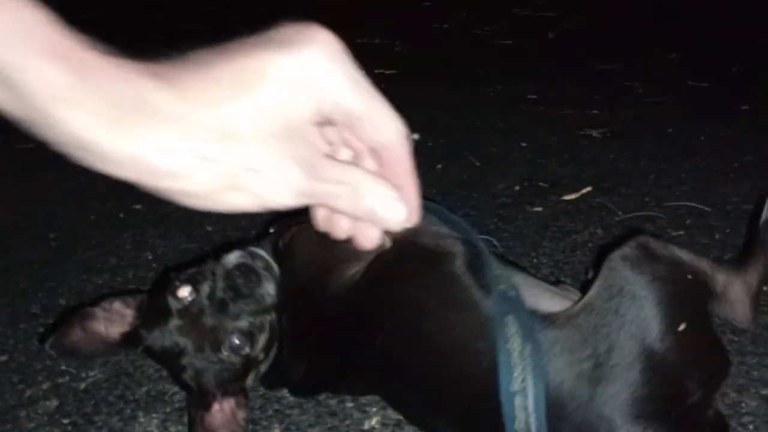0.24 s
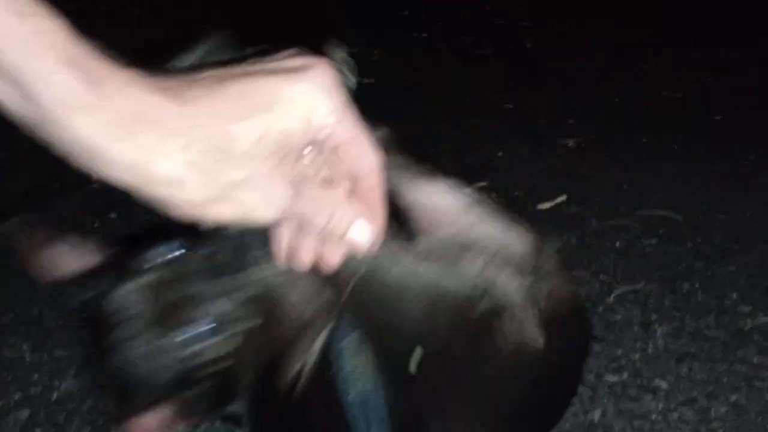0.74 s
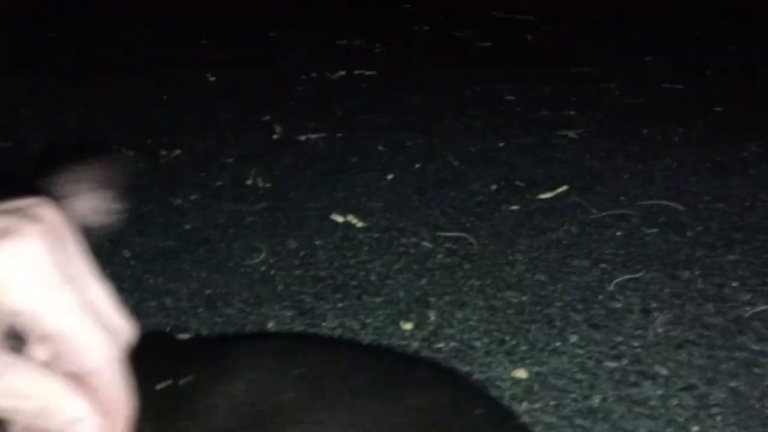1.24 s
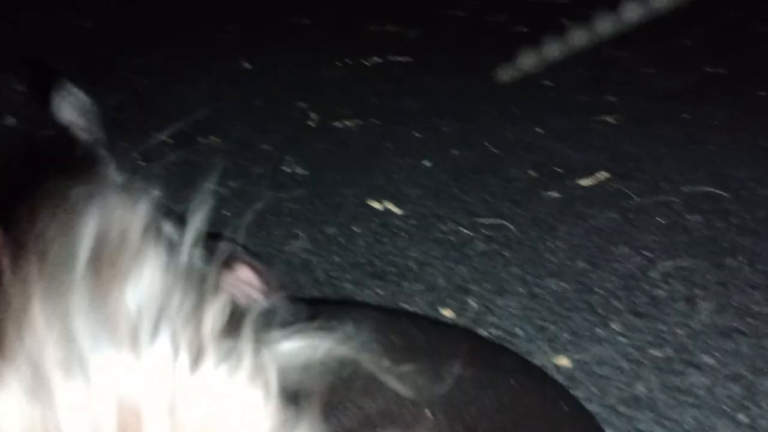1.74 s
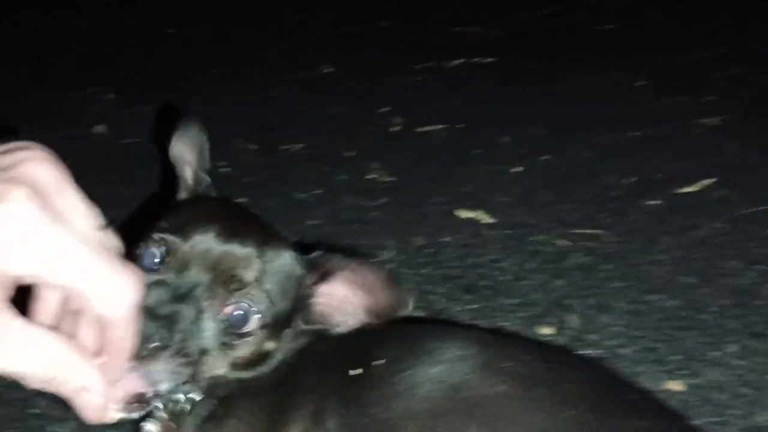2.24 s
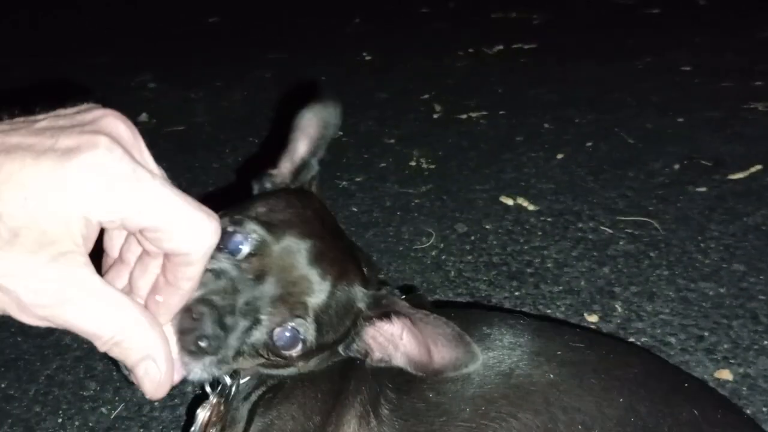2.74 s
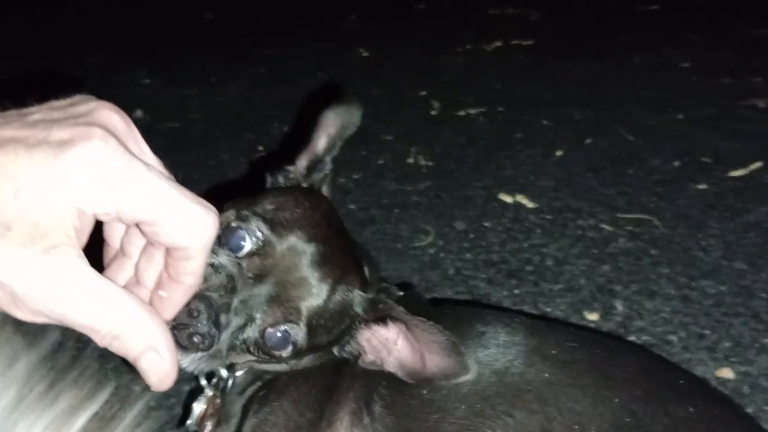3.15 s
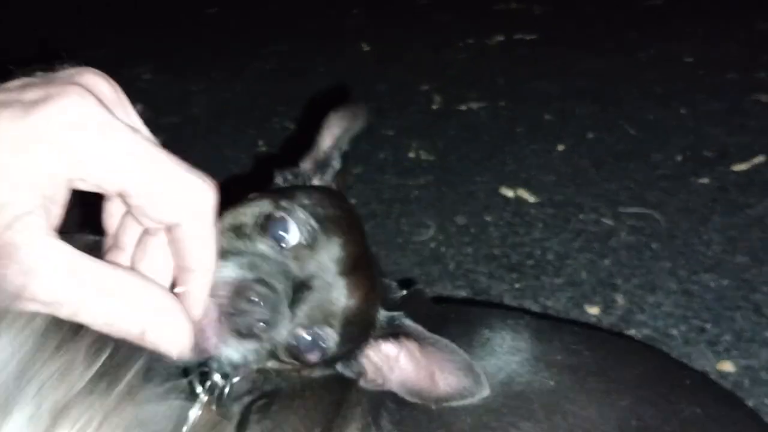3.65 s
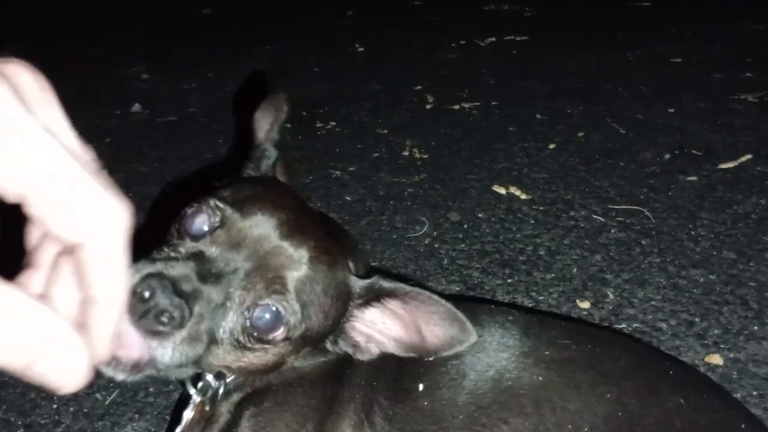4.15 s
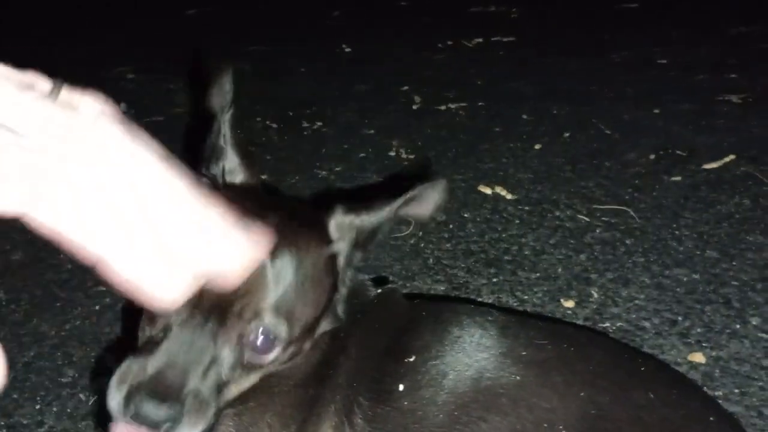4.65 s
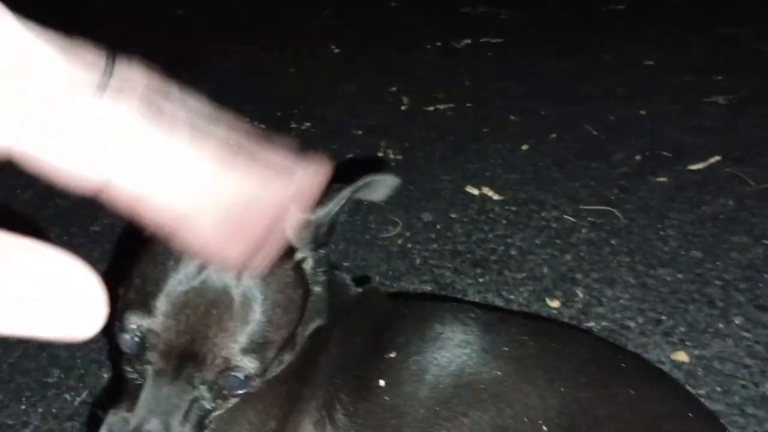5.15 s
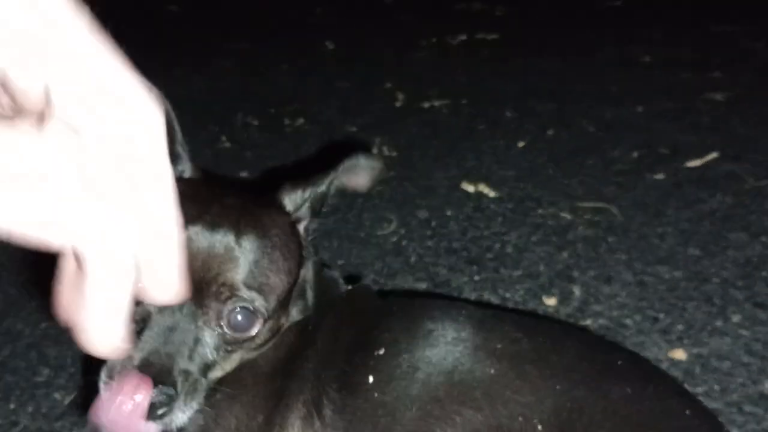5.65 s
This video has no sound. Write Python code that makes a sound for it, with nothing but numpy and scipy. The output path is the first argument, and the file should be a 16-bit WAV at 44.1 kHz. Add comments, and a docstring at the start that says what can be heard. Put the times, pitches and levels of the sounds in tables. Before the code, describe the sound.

Two dogs petted on asphalt, very near the microphone, mostly left of centre. Rubbing swishes swell and fade; tags rattle brightly just after one second, then tinkle in isolated clinks. Low bumps of fingers on the camera cluster mid-way. Far off, muffled firework-like bangs sound, the strongest past three seconds, rolling away over a low, soft night murmur.

```python
"""On asphalt at night, two dogs are petted close to a hand-held camera.
Collar tags jingle (ringing discs), a hand and a harness rub fur (swelling noise), and claws and grit
tick (short bursts of tones). Fingers and a collar bump the camera (low damped notes and noise).
Far away a few bangs, probably fireworks, go off as filtered pulses; the loudest rolls around
the neighbourhood as fading, lumpy noise. Soft night air lies under it all."""
import sys
import numpy as np
from scipy import signal
from scipy.fft import rfft, irfft
from scipy.io import wavfile
from scipy.ndimage import uniform_filter1d

SR = 44100
rng = np.random.default_rng(int(sys.argv[2]) if len(sys.argv) > 2 else 0)


def unload_audio(sound):
    """Save the sound as a 16-bit wav file, at the path given as the first command line argument."""
    columns = np.transpose(np.atleast_2d(sound))
    # keep every value between -1 and 1, then stretch to whole-number steps
    steps = np.round(np.clip(columns, -1, 1) * 32767)
    wavfile.write(sys.argv[1], SR, steps.astype(np.int16))


N = 260631
TIME = np.arange(N) / SR  # seconds

# All levels are in dB before the final mix and limiter. Colours are relative: noise is brought
# to one strength after colouring. A positive left-right dB means louder on the left.

# Night air. Each row: pitch in Hz, relative level in dB.
AIR_COLOUR = [(25, -18), (50, -8), (80, 5.5), (130, 6.5), (250, 0.5), (400, -9.5), (700, -15.5),
              (1200, -21), (2200, -31.5), (5000, -33.5), (9000, -43), (16000, -57.5)]
# How alike left and right noise are. Each row: pitch in Hz, correlation (1 is identical).
LIKENESS = [(30, 0.019), (100, 0.82), (250, 0.89), (500, 0.42), (1000, 0.21), (2500, 0), (16000, 0)]
# The long roll: near houses answer loudly and briefly, far ones softly and for long.
# Each row: starting level in dB before the roll's own gain, fading in dB per second.
ROLL_FADES = [(-35.5, 84), (-49, 6)]
# Colour of the roll. Each row: pitch in Hz, relative level in dB.
ROLL_COLOUR = [(30, -32), (60, -6), (100, -2), (170, -0.5), (300, -4.5), (400, -9.5), (520, -24.5),
               (800, -24.5), (1300, -30.5), (2200, -47), (4000, -97)]
# Distant bangs and their distinct echoes. Each row: start in seconds, peak of the blast in dB,
# pulse length in milliseconds, then crack and scatter in dB, each before its shared gain.
BANGS = [(0.4427, -37, 1.07, -9, 0.5), (0.4692, -31, 0.73, -6, -8.5), (1.067, -43.5, 0.68, -9, -40),
         (1.101, -38.5, 0.72, -7, -27), (1.1088, -41.5, 0.77, -14, -26.5), (1.692, -51.5, 0.87, 4, 15),
         (1.717, -35, 0.49, 0, -4), (3.359, -14.5, 1.83, -13.5, -18.5), (3.3678, -20.5, 1.64, -15.5, -17.5),
         (3.3772, -28, 1.9, -22.5, -24.5), (3.3896, -12.5, 1.96, -13.5, -19),
         (3.3957, -21, 1.44, -28, -15.5), (3.403, -24, 1.8, -14, -22), (3.461, -39, 0.78, -0.5, -14),
         (3.496, -35, 0.54, -15, -18), (3.521, -30.5, 1.74, -22, -20), (4.632, -43, 1.1, -21, -15.5)]
# Colours of the crack and of the scattered sound. Each row: pitch in Hz, relative level in dB.
CRACK_COLOUR = [(60, -50), (200, 0.5), (450, -7.5), (700, 1), (1000, -10.5), (1500, -17), (2400, -24),
                (3100, -45), (4500, -58.5)]
SCATTER_COLOUR = [(40, -40), (100, -10.5), (200, 1.5), (350, 1.5), (480, -4.5), (750, -5.5), (1100, -19),
                  (1600, -23), (2400, -34.5), (3500, -65.5)]
# Fingers shifting on the camera body.
# Each row: start in seconds, level in dB before the shared bump gain, left-right dB.
BUMPS = [(0.763, -43.5, 38), (0.811, -41.5, 19), (2.188, -42, 1), (2.213, -36, 0), (2.298, -30.5, 26),
         (2.377, -33, 31.5), (2.394, -34, 30.5), (2.412, -32.5, 22.5), (2.461, -37.5, 19),
         (2.504, -33.5, 29), (2.569, -41.5, 12), (2.724, -35.5, 33.5), (2.765, -36.5, 23),
         (2.819, -41.5, 23), (2.867, -30, 33), (2.909, -39.5, 24), (2.955, -35, 32), (3, -31, 35),
         (3.032, -42, 29.5), (3.112, -38.5, 29), (4.139, -36.5, 37), (4.68, -43.5, 32.5), (4.79, -39, 19.5),
         (4.978, -42.5, 26)]
# Harness webbing sliding over the coat. Each row: fastest moment in seconds,
# speeding up in seconds, slowing down in seconds, level in dB.
SLIDES = [(1.58, 0.069, 0.047, -69), (2.277, 0.018, 0.022, -65), (2.735, 0.03, 0.02, -70.5),
          (3.06, 0.048, 0.057, -64.5), (5.2, 0.09, 0.14, -77.5)]
# Hiss of the webbing. Each row: pitch in Hz, relative level in dB.
WEBBING_COLOUR = [(1500, -24), (3300, -14), (4500, -3.5), (6000, -1), (7500, -5), (10000, -16),
                  (16000, -29.5)]
# Hand and harness on fur. Each row: fastest moment in seconds, speeding up in seconds,
# slowing down in seconds, low swish in dB, high fizz in dB, left-right dB.
STROKES = [(.13, 0.12, .16, -58, -65.5, 6.5), (.405, 0.068, 0.1, -54.5, -60, 11),
           (0.571, 0.05, 0.078, -63.5, -71, 7), (1.02, 0.13, .14, -60.5, -69, 2),
           (1.53, 0.16, 0.14, -62, -76.5, 7), (1.762, 0.058, 0.089, -78, -92, 17.5),
           (2.83, 0.043, 0.028, -69, -68, -3), (3.07, 0.033, 0.067, -67, -78, 3),
           (3.601, .07, 0.36, -74.5, -82.5, 4), (4.021, 0.066, 0.21, -71.5, -80, 7.5),
           (4.277, 0.028, 0.038, -59.5, -48.5, 10), (4.44, .07, 0.14, -61, -76, 3.5),
           (4.88, 0.1, 0.088, -68, -72, -2), (5.131, 0.14, 0.13, -67.5, -76.5, -1),
           (5.64, 0.042, .04, -69.5, -76, -1), (5.9, 0.083, .08, -67.5, -66.5, 4)]
# Colours of swish and fizz. Each row: pitch in Hz, relative level in dB.
SWISH_COLOUR = [(30, -3.5), (150, 18), (300, 16.5), (500, 9), (750, 3.5), (1100, -4), (1800, -0.5),
                (2800, 2), (4100, -0.5), (5200, 2.5), (6800, -2.5), (8400, 2), (11000, -25), (16000, -43.5)]
FIZZ_COLOUR = [(2000, -72), (6000, 5.5), (9000, 10.5), (12000, 4.5), (16000, 9)]
# Claws, grit and harness fittings. Each row: start in seconds, peak in dB, centre in Hz,
# spread to either side in octaves.
TICKS = [(.204, -55, 7600, .1), (0.638, -51, 4770, .34), (0.825, -54.5, 7200, 0.24),
         (0.881, -52.5, 6920, 0.25), (.9444, -42, 6100, 1.2), (0.9706, -43.5, 12700, 0.49),
         (1.002, -42, 12000, 1.5), (1.0188, -43.5, 4000, 0.28), (1.047, -52, 6500, 1),
         (1.066, -41.5, 7100, 1.1), (1.082, -49.5, 3680, 0.055), (1.1073, -44, 5440, 0.96),
         (1.129, -41, 13000, 1.8), (1.8556, -61.5, 9400, .4), (1.8808, -58.5, 4380, 0.17),
         (1.9323, -55.5, 4800, 0.11), (1.947, -51.5, 4540, .3), (1.992, -48.5, 2270, 0.3),
         (2.247, -52, 8200, .23), (2.305, -58.5, 9000, .5), (2.358, -56.5, 10500, .4),
         (2.4556, -56, 3980, 0.35), (2.613, -51.5, 7240, 0.39), (3.123, -49.5, 5960, 0.77),
         (3.456, -43.5, 5430, 2.4), (3.526, -40, 9100, 0.5), (3.577, -56.5, 5200, 0.099),
         (3.625, -44, 8350, 1.1), (3.75, -56, 7900, 0.44), (3.819, -51, 2600, 0.33),
         (3.8298, -42, 5000, 0.28), (3.967, -51, 6000, .46), (3.982, -50, 8000, .7),
         (4.567, -50.5, 2780, 0.19), (4.575, -49, 6960, 1.4), (4.928, -52, 7700, 0.49),
         (5.1564, -51.5, 7300, 0.17), (5.59, -61, 4500, .08)]
# Tags of the shaggy dog as it pushes past. Each row: start in seconds, peak in dB, treble tilt
# in dB per octave, then ring of the first and of the second tag in dB before the dog's ring level.
SHAGGY_HITS = [(1.183, -41, -8, -8.5, -2), (1.190, -24.5, -6, 9, 4), (1.198, -26.5, 14, 7, -9),
               (1.207, -26, -9.5, 7, -6), (1.2215, -19, -8.5, -11, 6), (1.227, -21.5, 1.5, 16, -8),
               (1.2375, -18, 0, -2.5, 9.5), (1.243, -23, -0.5, -8, 13.5), (1.2478, -6.5, 7, 7.5, 10),
               (1.252, -14, 11.5, 11, -12), (1.295, -33.5, -9, 4, -10), (1.305, -25, -5, -2, 1),
               (1.3115, -16, -1.5, 2.5, -13), (1.320, -31, -6, -4, 8), (1.333, -28, -7, -13, -13),
               (1.343, -40, -5, 0, -5), (1.353, -37, -11, -14, 1), (1.360, -25, -1, -22, 4),
               (1.366, -23.5, -5, -1, 1), (1.379, -22, 1, -15, -12), (1.4075, -39.5, -5, -7, 1),
               (1.460, -41, -5, -17, -2), (1.4685, -29.5, -6, -2.5, -7), (1.540, -45.5, -3.5, -8.5, -17)]
# Tags of the black dog as it turns its head. Each row: the same columns.
BLACK_HITS = [(2.404, -20.5, 1.5, 6, -26), (2.5945, -41, -0.5, -7, -13), (2.7105, -47.5, 3, -11, -7),
              (2.7788, -21, 5.5, -2.5, -14), (2.805, -28, 1, 3, -21), (2.818, -29, -1, -6, 0),
              (2.823, -26, 0, 7, -21), (2.8445, -36.5, 0, -3, -9), (2.871, -47, 4, -2, -6),
              (2.921, -46.5, 2, 4, -4), (2.9455, -31, 4, -4, -29), (2.958, -24.5, 13, 5.5, -25),
              (3.0748, -18, 0.5, -6, -31), (3.082, -29, -1.5, -5, -22), (3.9995, -26.5, 0, -18, -22),
              (4.180, -42, 3, -6, -2), (4.1975, -35, 12, -8, -7), (4.3815, -34, -10.5, 7, 10),
              (4.418, -38, -1, 7, -15), (4.431, -31, -6.5, 6, 3), (4.449, -46, 3, -3, 8),
              (4.4815, -41, -9, -11, 4), (4.515, -44, -10, -7, -1), (4.7575, -34.5, 2.5, -16, 3),
              (4.8003, -42, -7, -10, -4.5), (4.885, -36, 9, 12, -12), (4.9645, -47.5, -4, 3.5, -21),
              (5.0173, -35, 1, -8, -3.5), (5.0655, -41, 1, -8, -6), (5.11, -53.5, 0, -10, 2),
              (5.376, -40.5, 3, -2.5, -5), (5.463, -50, -4.5, -5.5, 2), (5.5195, -45, -10.5, -14, 4),
              (5.626, -47, 2, -21.5, -5), (5.668, -50.5, -9, -2.5, 7.5)]
# The tags graze just before each contact and fall back together after it.
# Each row: typical time from the contact in seconds, level in dB relative to the contact.
SOFT_TOUCHES = [(-.005, -21.5), (.011, -19.5), (0.029, -31.5)]
# The dry clack of metal on metal. Each row: pitch in Hz, relative level in dB.
CLACK_COLOUR = [(1000, -45), (2200, -21.5), (4000, -9), (6500, 1), (9000, 3), (12000, 2.5), (13600, -2),
                (15200, 4), (16000, 2)]
# Natural tones of each dog's two tags, one list per tag. Each row: typical pitch in Hz, typical
# relative level in dB, seconds to fade by 60 dB before each hit makes it longer or shorter.
SHAGGY_TAGS = [
    [(2775, -37.5, .38), (8600, -4.5, .12), (9890, 4.5, 0.088), (12610, -13.5, 0.067), (16100, -4.5, .035)],
    [(3130, -15, 0.023), (6480, -16.5, 0.043), (7250, -22, .07), (12104, -1, 0.028), (11470, 3.5, .04),
     (11740, -4.5, .045), (15350, -6.5, 0.048), (15580, 0, 0.031)],
]
BLACK_TAGS = [
    [(4320, -14.5, 0.04), (5400, -19, 0.069), (7906, 11, 0.026), (7910, -33, 0.27), (8280, -9.5, 0.046),
     (10920, 6, 0.031), (10800, -31, 0.2), (11860, -8, .04), (11480, -5, 0.041), (14590, 2, 0.035)],
    [(4530, -9.5, 0.067), (6730, -9, 0.032), (7360, 11.5, 0.055), (9900, -9.5, 0.084), (12060, -3, 0.073),
     (7460, 5, 0.024)],
]
# Where each collar hangs as the dog moves. Each row: time in seconds, left-right dB.
SHAGGY_SIDE = [(1.19, 16), (1.354, 7), (1.426, 5), (1.5, 8)]
BLACK_SIDE = [(2.4, 12.5), (3, 17), (4, 10.5), (4.45, 14), (4.8, 5.5), (5.65, 0.5)]

AIR_DB = -61
ROLL_START_S, ROLL_RISE_S = 3.42, 0.043
CASE_HZ = 119  # typical low note of the camera case
STROKE_SHAPE = 1.3  # 1 is a pointed swell, 2 a round one
TICK_SIDE_DB = 10.5  # left-right
CEILING_DB, RECOVERY_DB_PER_S = -12, 35.5  # limiter
EDGE_HZ = 15950  # highest pitch let through


def amp(db):
    """Turn dB into a plain multiplier."""
    return 10 ** (np.asarray(db) / 20)


def unit_rms(x):
    """Scale to an average strength (rms) of 1."""
    return x / np.sqrt(np.mean(x ** 2) + 1e-20)


def unit_peak(x):
    """Scale so the largest swing is 1."""
    return x / (abs(x).max() + 1e-12)


def read(points, hz):
    """Read a curve between its points, with pitch on a logarithmic scale."""
    f, value = np.transpose(points)
    return np.interp(np.log(hz + 1), np.log(f + 1), value)


def add(mix, s, sound):
    """Add a sound to the mix, starting at s seconds."""
    part = mix[:, max(round(s * SR), 0):][:, :sound.shape[1]]
    part += sound[:, :part.shape[1]]


def pan(side_db):
    """Left and right gains of constant power."""
    gains = amp(np.array([side_db, -side_db]) / 2).reshape(2, -1)
    return gains / np.sqrt(np.mean(gains ** 2, 0))


def onset(t, rise_s):
    """A quick smooth rise from 0 towards 1."""
    return 1 - np.exp(-t / rise_s)


def noise(colour, size):
    """Two channels of coloured noise, alike in the bass and unrelated in the treble."""
    hz = np.fft.rfftfreq(size, 1 / SR)
    left, other = rfft(rng.standard_normal((2, size)))
    same = np.clip(read(LIKENESS, hz), -1, 1)
    right = same * left + np.sqrt(1 - same ** 2) * other
    return unit_rms(irfft(np.array([left, right]) * amp(read(colour, hz)), size))


def grains(width):
    """Random ups and downs of strength 1, smoothed over this many samples."""
    return unit_rms(uniform_filter1d(rng.standard_normal(N), size=width))


def swell(s, rise_s, fall_s):
    """The speed of one stroke: up to 1 at time s and down again."""
    distance = np.maximum((s - TIME) / rise_s, (TIME - s) / fall_s).clip(0, 6)
    return np.exp(-distance ** STROKE_SHAPE)


def ring(hz, db, t60, t):
    """Fading tones of unit total strength; each reaches the two ports with its own phase."""
    step = np.exp((2j * np.pi * hz - np.log(1000) / t60) / SR)
    decays = np.cumprod(np.broadcast_to(step[:, None], (len(hz), len(t))), axis=1)
    phases = np.exp(2j * np.pi * rng.random((2, len(hz))))
    strength = amp(db) / np.linalg.norm(amp(db)) * phases
    return np.einsum("cm,mt->ct", strength, decays).real


def clatter(colour, t60, skip_s, count=64, size=1400):
    """Many short random tones of small parts, struck a few times within milliseconds."""
    t = np.arange(size) / SR
    hz = (np.arange(count) + 2 + rng.random(count)) * 16000 / count
    uneven_db = 4 * rng.standard_normal(count)
    tones = ring(hz, colour(hz) + uneven_db, t60 * rng.uniform(0.21, 1.5, count), t)
    body = tones * (1 - np.exp(-(t / 0.00066) ** 2))
    out = np.zeros((2, SR // 4))
    for k, force in enumerate([0.91, 1, 0.43, 0.046]):
        add(out, k * skip_s * rng.uniform(.7, 1.3), force * body)
    return unit_peak(out)


def air():
    """The steady low murmur of the outdoors with a faint hiss on top, as coloured noise."""
    return amp(AIR_DB) * noise(AIR_COLOUR, N)


def roll(gain_db=-2, lumps_db=2):
    """Countless echoes of the big bang arrive in lumps and fade steadily."""
    age = np.maximum(TIME - ROLL_START_S, 0)
    level = np.sqrt(sum(amp(db - fade * age) ** 2 for db, fade in ROLL_FADES))
    rise = np.minimum(age / ROLL_RISE_S, 1)
    lumps = amp(gain_db + lumps_db * grains(900))
    return rise * level * lumps * noise(ROLL_COLOUR, N)


def bangs(low_hz=118, top_hz=560, crack_t60=0.077, scatter_t60=0.74, scatter_db=-14, crack_db=-5):
    """Blast waves, rounded by distance and stripped of deep bass, then scattered by houses and trees."""
    out, t = np.zeros((2, N)), np.arange(SR) / SR
    bass_cut = signal.butter(4, low_hz, "highpass", fs=SR, output="sos")
    for s, db, length_ms, sharp_db, wet_db in BANGS:
        u = t * 1e3 / length_ms  # time in pulse lengths
        pulse = (u - 1) * np.exp(-u)
        # longer pulses lose more treble: top_hz is the edge for a 1 ms pulse
        distance = signal.butter(4, min(top_hz / length_ms, 8000), fs=SR, output="sos")
        blast = unit_peak(signal.sosfilt(np.vstack([bass_cut, distance]), pulse))
        # the wave reaches the right port a little earlier
        blast = np.array([np.interp(t - .00022, t, blast), blast])
        crack_fade = amp(crack_db + sharp_db - 60 * t / crack_t60)
        crack = noise(CRACK_COLOUR, len(t)) * crack_fade * onset(t, 0.00066)
        scatter_fade = amp(scatter_db + wet_db - 60 * t / scatter_t60)
        scatter = noise(SCATTER_COLOUR, len(t)) * scatter_fade * onset(t, 0.0017)
        add(out, s, amp(db) * (blast + crack + scatter))
    return out


def handling(rise_s=0.0099, scuff_db=-13, gain_db=-3, spread_octaves=0.087):
    """A finger slips and the case answers with a few low, damped cycles."""
    out, t = np.zeros((2, N)), np.arange(8192) / SR
    scuff_colour = [(25, -31.5), (60, 2.5), (95, 10), (220, -5.5), (350, -23.5), (800, -41.0),
                    (3000, -51.5)]  # Hz, relative dB
    for s, db, side_db in BUMPS:
        hz = CASE_HZ * 2 ** (spread_octaves * rng.standard_normal())
        push = (t / rise_s) ** 2 * np.exp(-t / rise_s * 2.15)
        scuff = amp(scuff_db) * noise(scuff_colour, len(t)) * np.sqrt(push)
        bump = push * np.sin(2 * np.pi * hz * t) + scuff
        add(out, s, amp(db + gain_db) * pan(side_db) * unit_peak(bump))
    return out


def knock(s=1.2485, db=-30, side_db=15, t60=0.029):
    """The shaggy dog's collar knocks against the camera: a short dull burst of noise."""
    out, t = np.zeros((2, N)), np.arange(2048) / SR
    colour = [(60, -9), (200, -3.0), (500, -6.5), (1000, -9.5), (2000, -14), (5000, -21.5),
              (12000, -42.5)]  # Hz, relative dB
    thud = noise(colour, len(t)) * amp(-60 * t / t60) * onset(t, 0.00026)
    add(out, s, amp(db) * pan(side_db) * unit_peak(thud))
    return out


def harness(side_db=11, grain_db=2):
    """The weave of the strap rasps over the hairs with a narrow, grainy hiss."""
    level = sum(amp(db) * swell(*timing) for *timing, db in SLIDES)
    rasp = unit_rms(amp(grain_db * grains(60)))
    return level * pan(side_db) * rasp * noise(WEBBING_COLOUR, N)


def fur(grain_db=2.5, clump_db=1.54):
    """Each stroke swells and dies away; under it hairs flick past the skin in tiny clumps."""
    power = np.zeros((2, 2, N))  # swish or fizz, left or right, time
    for s, rise_s, fall_s, swish_db, fizz_db, side_db in STROKES:
        peaks = amp([swish_db, fizz_db])[:, None, None] * pan(side_db)
        power += peaks ** 2 * swell(s, rise_s, fall_s) ** 2
    swish_level, fizz_level = np.sqrt(power)
    texture = unit_rms(amp(grain_db * grains(40) + clump_db * grains(500)))
    return texture * (swish_level * noise(SWISH_COLOUR, N) + fizz_level * noise(FIZZ_COLOUR, N))


def beside_hand(x, delay_s=0.001087, sway=0.046, share=0.17):
    """The moving hand reflects nearby sound: a faint, drifting copy combs the spectrum."""
    drift = unit_rms(sum(np.sin(2 * np.pi * (f * TIME + rng.random())) for f in (.3, .5, .8)))
    late = TIME - delay_s * (1 + sway * drift)
    reflection = np.array([np.interp(late, TIME, side) for side in x])
    return (x + share * reflection) / np.hypot(1, share)


def tick(db, centre_hz, side_db, octaves, t60=0.023, skip_s=.0008):
    """A small hard contact: a snap around one broad resonance."""
    def resonance(hz):
        return -17 * np.log10(1 + (np.log2(hz / centre_hz) / octaves) ** 2)
    return amp(db) * pan(side_db) * clatter(resonance, t60, skip_s)


def ticks(faint_db=-61, faint_hz=7000, stray_s=.14, count=32):
    """The distinct ticks, and faint ones scattered around each stroke as the dogs shift."""
    out = np.zeros((2, N))
    for s, db, hz, octaves in TICKS:
        add(out, s, tick(db, hz, TICK_SIDE_DB, octaves))
    for k, (when, size, pitch) in enumerate(rng.random((count, 3))):
        s = STROKES[k % len(STROKES)][0] + stray_s * (2 * when - 1)
        db = faint_db + 10 * (size - .5)
        hz = faint_hz * 2 ** (pitch - .5)
        add(out, s, tick(db, hz, TICK_SIDE_DB, 0.21))
    return out


def tags(hits, path, discs, clack_t60, skip_s, ring_db, wash_db, scrape_db):
    """Each contact clacks and rings the two discs; where it lands decides which tones speak."""
    out, t = np.zeros((2, N)), np.arange(SR // 4) / SR
    for s, db, tilt_db, *disc_db in hits:
        place = pan(np.interp(s, *np.transpose(path)))
        hit = clatter(lambda hz: read(CLACK_COLOUR, hz) + tilt_db * np.log2(hz / 9000), clack_t60, skip_s)
        for modes, level_db in zip(discs, disc_db):
            hz, mode_db, t60 = np.transpose(modes)
            hz = hz * (1 + .002 * rng.standard_normal(len(hz)))
            uneven_db = 3.5 * rng.standard_normal(len(hz))
            # a tag that swings clear of the fur rings both louder and longer
            freedom = amp(.3 * level_db)
            tones = ring(hz, mode_db + uneven_db, t60 * freedom, t)
            hit += amp(ring_db + level_db) * tones * (1 - np.exp(-(t / 0.0005) ** 2))
        # the edges scrape for a moment after they meet
        hit += noise(CLACK_COLOUR, len(t)) * amp(scrape_db - 60 * t / .035) * onset(t, .0025)
        # ground and bodies return a faint wash
        hit += noise(CLACK_COLOUR, len(t)) * amp(wash_db - 60 * t / .12) * onset(t, .004)
        add(out, s, amp(db) * place * unit_peak(hit))
        for lag_s, soft_db in SOFT_TOUCHES:
            touch = clatter(lambda hz: read(CLACK_COLOUR, hz), clack_t60, skip_s)
            add(out, s + lag_s * (.5 + rng.random()), amp(db + soft_db) * place * touch)
    return out


def scene():
    """Everything close by, over the far bangs and the night air."""
    far = air() + roll() + bangs()
    touching = handling() + knock() + harness() + beside_hand(fur()) + ticks()
    shaggy = tags(SHAGGY_HITS, SHAGGY_SIDE, SHAGGY_TAGS, clack_t60=.03, skip_s=.0014,
                  ring_db=-5, wash_db=-28.5, scrape_db=-4.0)
    black = tags(BLACK_HITS, BLACK_SIDE, BLACK_TAGS, clack_t60=0.014, skip_s=0.0008,
                 ring_db=-4.5, wash_db=-46, scrape_db=-13.5)
    return far + touching + amp(0.5) * (shaggy + black)


def record(dry):
    """A limiter turns everything down at peaks over its ceiling and recovers slowly; then treble is cut."""
    over_db = np.maximum(20 * np.log10(abs(dry).max(0) + 1e-9) - CEILING_DB, 0)
    recovered = RECOVERY_DB_PER_S * TIME
    # hold the largest overshoot so far, less what has been recovered since
    held_db = np.maximum.accumulate(over_db + recovered) - recovered
    duck_db = uniform_filter1d(held_db, size=64)
    treble_cut = signal.firwin(511, EDGE_HZ, window=("kaiser", 8), fs=SR)
    return signal.oaconvolve(dry * amp(-duck_db), treble_cut[None], "same")


dry = scene()
out = record(dry)
unload_audio(out)
```